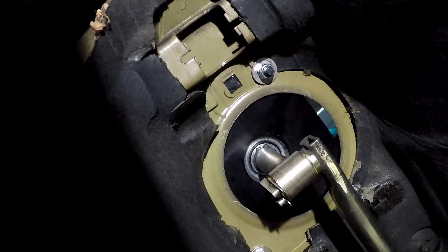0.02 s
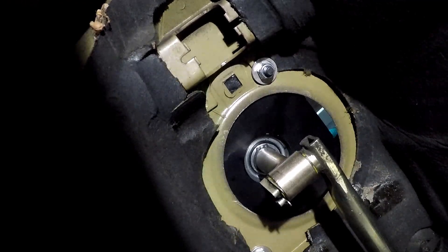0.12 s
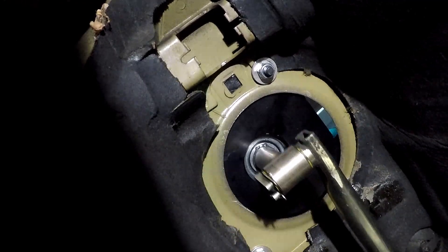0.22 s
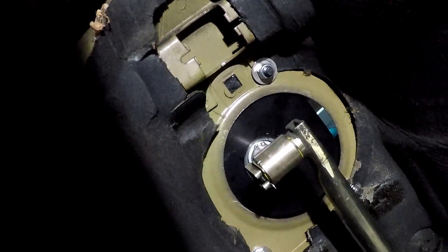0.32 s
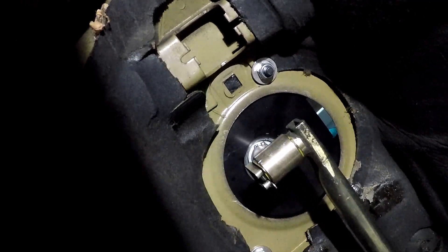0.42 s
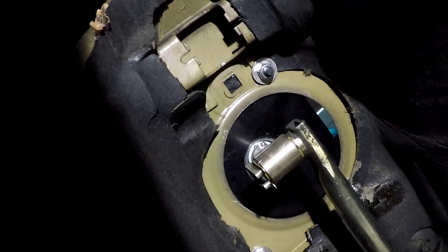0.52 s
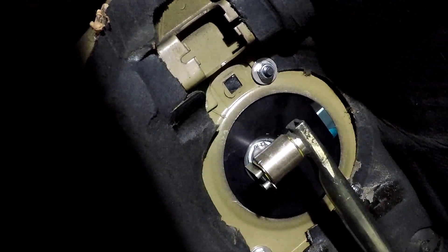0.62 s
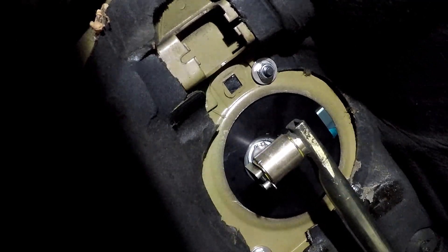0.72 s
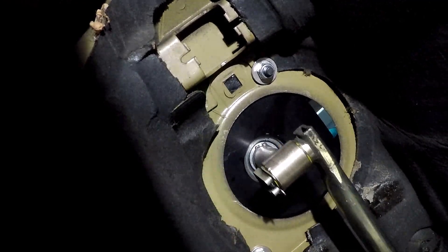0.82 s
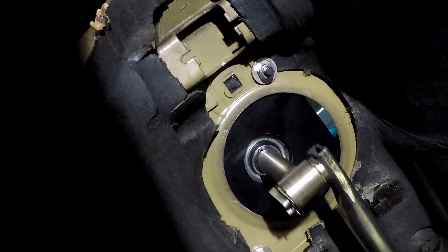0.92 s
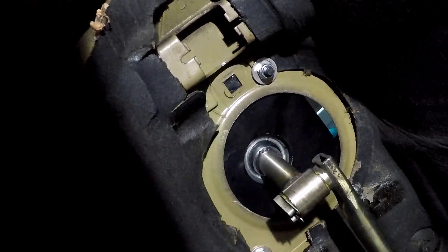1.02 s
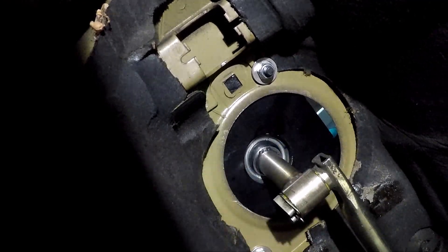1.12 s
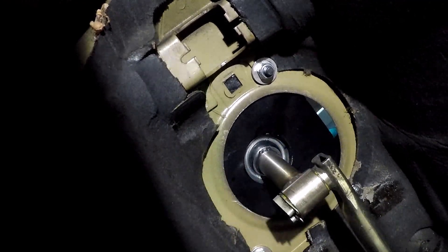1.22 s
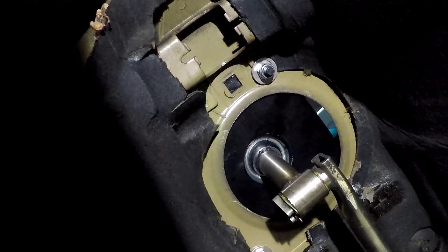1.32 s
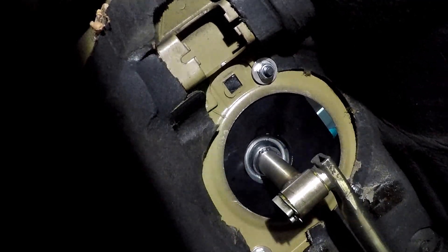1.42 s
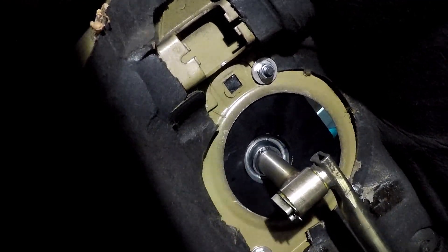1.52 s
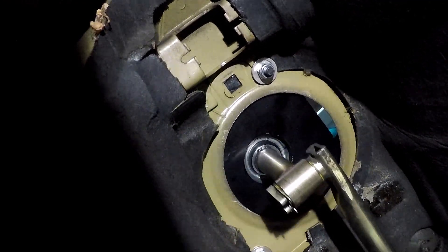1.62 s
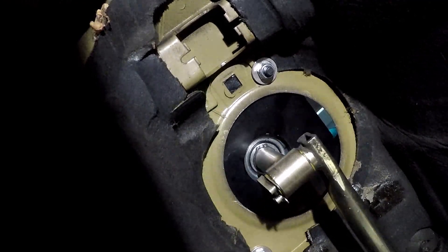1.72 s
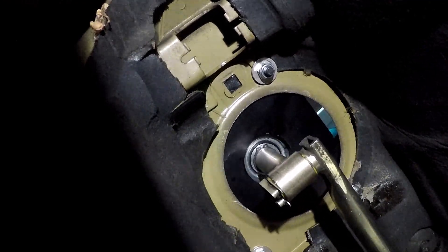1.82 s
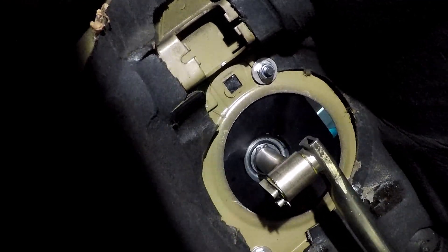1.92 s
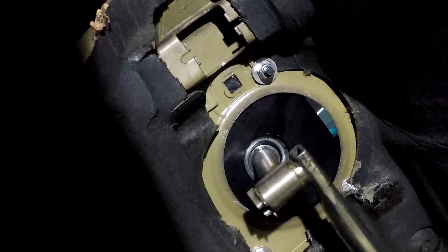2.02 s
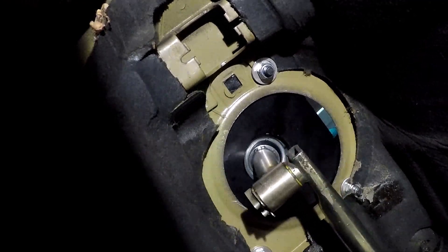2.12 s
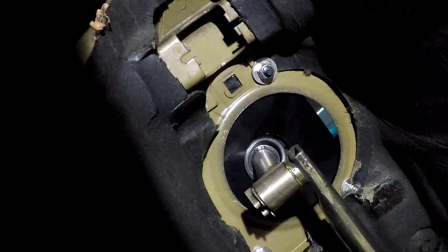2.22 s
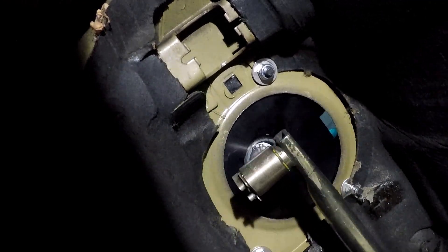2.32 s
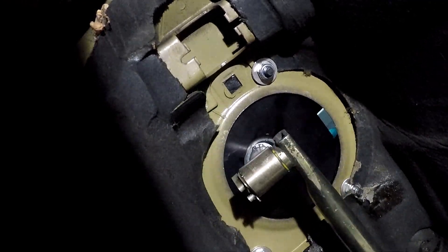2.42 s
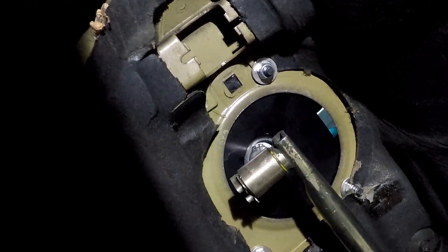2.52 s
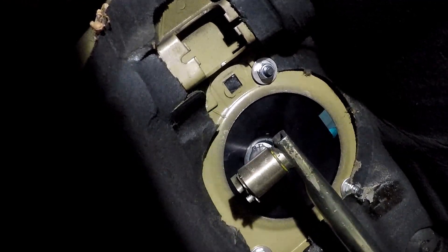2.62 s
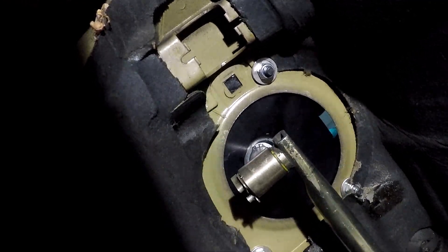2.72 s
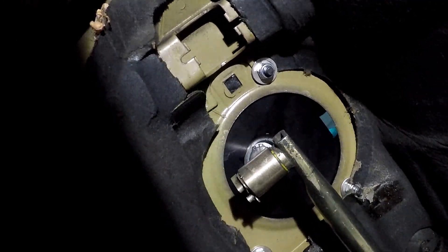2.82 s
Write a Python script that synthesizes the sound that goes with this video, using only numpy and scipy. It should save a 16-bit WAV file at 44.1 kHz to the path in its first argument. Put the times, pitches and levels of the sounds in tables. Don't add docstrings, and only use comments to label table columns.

```python
import sys
import numpy as np
from scipy import signal
from scipy.fft import rfft, irfft
from scipy.io import wavfile
from scipy.ndimage import uniform_filter1d, minimum_filter1d

SR = 44100
rng = np.random.default_rng(int(sys.argv[2]) if len(sys.argv) > 2 else 0)


def pcm_store(signal):
    levels = np.round(np.clip(np.atleast_2d(signal), -1, 1) * 32767)
    wavfile.write(sys.argv[1], SR, levels.astype(np.int16).T)


def invert_db(x):
    u = np.asarray(x, float) / 20
    return 10 ** u


N = 125685


def unit(x):
    return x / np.sqrt(np.mean(x ** 2) + 1e-30)


def resonance(x, hz, width):
    return signal.lfilter(*signal.iirpeak(hz, hz / width, fs=SR), x)


def double_resonance(x, hz, width):
    return resonance(resonance(x, hz, width), hz, width)


def wander(rate):
    hold = int(SR / rate)
    steps = np.repeat(rng.standard_normal(N // hold + 1), hold)
    return unit(uniform_filter1d(uniform_filter1d(steps, hold), hold)[:N])


def add(out, start_s, x):
    i = max(int(start_s * SR), 0)
    out[i:i + len(x)] += x[:N - i]


def soften(x, hz):
    return signal.sosfilt(signal.butter(4, min(hz, 15000), fs=SR, output="sos"), x)


# frequency in Hz, density in dB per Hz.
AIR_SPECTRUM = [(30, 5.5), (62, 4), (150, 9.5), (270, -15), (2200, -33.5), (3800, -44), (6000, -47),
                (13500, -57)]
# frequency in Hz, width in Hz, level in dB.
ROOM_RESONANCES = [(64, 5.9, -57), (119.8, 8.9, -54.5), (181, 21, -56.5), (390, 34, -72.5), (633, 100, -71),
                   (8100, 2400, -81)]


def room_hum():
    f = np.fft.rfftfreq(N, 1 / SR) + 1
    hz, db = np.array(AIR_SPECTRUM).T
    shape = invert_db(np.interp(np.log(f), np.log(hz), db))
    out = invert_db(-45) * unit(irfft(rfft(rng.standard_normal(N)) * shape, N))
    for hz, width, db in ROOM_RESONANCES:
        lump = resonance(resonance(rng.standard_normal(N), hz, 2 * width), hz, width)
        out += invert_db(db + 0.83 * wander(9.2)) * unit(lump)
    return out


# start in seconds, length in seconds, level in dB, centre in Hz, width in Hz.
RUBS = [(0, 0.24, -65, 1060, 1870), (0.783, .014, -70, 6400, 250), (0.344, 0.23, -78.5, 9700, 2500),
        (0.404, 0.29, -84, 8750, 300), (0.753, 0.021, -74, 6700, 200), (0.775, 0.13, -52, 550, 700),
        (0.976, 0.22, -76.5, 9300, 2560), (1.321, 0.32, -64, 1800, 1500), (1.47, 0.2, -57, 600, 900),
        (1.682, 0.2, -76, 9400, 2800), (1.7, 0.28, -60, 800, 1400), (1.937, 0.3, -52.5, 800, 1070),
        (2.133, .16, -68.5, 8200, 4500), (2.119, .16, -65.5, 4300, 1500), (2.133, .14, -57, 600, 1400),
        (2.405, 0.14, -79, 9500, 2470), (2.772, .045, -71, 1560, 40), (2.812, .036, -63, 1350, 50),
        (2.79, .05, -70, 1030, 50), (1.925, .07, -62, 970, 120), (.877, .012, -62, 6900, 300),
        (1.1, .15, -84, 10000, 900)]


def boot():
    out, t = np.zeros(N), np.arange(SR // 2) / SR
    for start, length, db, hz, width in RUBS:
        roughness_db = 1.5 * rng.exponential(size=SR // 2) + 1.5 * wander(60)[:SR // 2]
        grit = rng.standard_normal(SR // 2) * invert_db(roughness_db)
        stroke = np.sin(np.pi * np.clip(t / length, 0, 1) ** .75) ** .8
        add(out, start, invert_db(db) * unit(double_resonance(grit, hz, width)) * stroke)
    return out


# start in seconds, peak level in dB, pitch in Hz, 60 dB decay time in seconds.
KNOCKED_PARTS = [(.210, -34, 480, .05), (.214, -21, 195, .13), (.256, -22, 215, .12),
                 (.283, -31, 4900, .015), (.297, -31, 675, .14), (.375, -48, 640, .16),
                 (.772, -29, 200, .08), (.774, -48, 620, .06), (.796, -45, 5900, .025),
                 (.803, -30, 205, .08), (.855, -44, 355, .08), (.900, -22, 205, .08), (.905, -30, 590, .12),
                 (.910, -27, 350, .14), (.963, -28, 580, .07), (.980, -28, 680, .13),
                 (1.459, -26, 180, .09), (1.460, -36, 850, .07), (1.49, -45, 350, .2),
                 (1.502, -55, 5800, .025), (1.630, -53, 4800, .03), (1.668, -29, 650, .06),
                 (1.672, -22, 205, .11), (1.69, -36, 350, .17), (1.765, -43, 580, .07),
                 (1.85, -49, 355, .17), (1.972, -45, 680, .12), (2.015, -39, 400, .06),
                 (2.050, -38, 1150, .04), (2.052, -33, 620, .06), (2.104, -27, 810, .07),
                 (2.11, -38, 2200, .06), (2.15, -45, 780, .1), (2.278, -43, 2300, .03),
                 (2.328, -31, 4950, .012), (2.335, -31, 675, .14), (2.42, -46, 350, .2),
                 (2.44, -51, 580, .12), (2.53, -55, 380, .2), (2.665, -59, 385, .25), (.252, -23, 128, .22),
                 (.962, -22, 68, .22), (1.675, -29, 72, .2), (2.308, -22, 72, .17), (2.102, -23, 200, .1),
                 (.378, -28, 125, .2), (2.2, -44, 300, .15)]


def brackets():
    split, second_db, choke, rise_cycles = .05, -5, 1.7, .6
    out, t = np.zeros(N), np.arange(SR // 2) / SR
    for start, db, hz, t60 in KNOCKED_PARTS:
        first = np.sin(2 * np.pi * hz * t)
        second = invert_db(second_db) * np.sin(2 * np.pi * hz * (1 - split) * t)
        decay = invert_db(db - 60 * (t / max(t60, .005)) ** choke)
        add(out, start, (first + second) * decay * (1 - np.exp(-t * hz / rise_cycles)))
    return out


# band centre in Hz, level in dB, 60 dB decay time in seconds.
GARAGE_TAIL = [(520, -31, 0.26), (1450, -29.5, 0.33), (2420, -35, 0.35), (4200, -27.5, 0.4),
               (6830, -27, 0.3), (9600, -18.5, 0.19)]


def garage(x):
    t = np.arange(SR // 2) / SR
    tail = np.zeros(len(t))
    for hz, db, t60 in GARAGE_TAIL:
        haze = unit(double_resonance(rng.standard_normal(len(t)), hz, hz * 0.74))
        tail += invert_db(db - 60 * t / t60) * haze / np.sqrt(t60 * SR / 28)
    build_up = 1 - np.exp(-t / 0.0024)
    return signal.fftconvolve(x, tail * build_up)[:N]


def ring(modes, chance, push):
    scatter_db, detune = .5, .015
    hz, db, t60 = np.tile(np.array(modes), (3, 1)).T[:, :, None]
    level_luck, pitch_luck, phase_luck = chance[:, :len(hz), None]
    hz = hz * (1 + detune * pitch_luck)
    t = np.arange(int(1.5 * t60.max() * SR)) / SR
    share = np.abs(rfft(push, 2 ** 14))[np.round(hz * 2 ** 14 / SR).astype(int)]
    gain = invert_db(db + scatter_db * level_luck - 60 * t / t60) / (share + 0.59 * share.mean())
    modes_sum = (gain * np.sin(2 * np.pi * hz * t + 3 * phase_luck)).sum(axis=0)
    return signal.fftconvolve(push, modes_sum)


# start in seconds, rod clank in dB, casing thud in dB, pin tick in dB,
# chatter in seconds.
GATE_STOPS = [(0.219, -30.5, -22, -52, 0.0024), (0.232, -23.5, -15, -45, 0.005),
              (.252, -18.5, -16, -37, 0.007), (0.269, -36, -17.5, -44, 0.0083),
              (.280, -19.5, -20, -33, 0.0058), (0.289, -56, -20.5, -35, 0.0067),
              (0.887, -22.5, -21.5, -32, 0.0094), (.900, -33, -19, -41, 0.024),
              (.948, -29, -15, -45, 0.0027), (0.963, -27, -39, -49, 0.024),
              (.978, -30.5, -20, -36.5, 0.0048), (1.457, -38.5, -19.5, -61.5, 0.0092),
              (1.666, -23.5, -20.5, -31.5, 0.0057), (1.677, -29, -19, -38, 0.0073),
              (2.104, -21.5, -16, -51.5, 0.0062), (2.277, -38, -30, -45, .005),
              (2.310, -19.5, -20, -32.5, 0.0049), (2.326, -20.5, -21, -34, 0.0062)]
# start in seconds, rod clank in dB, casing thud in dB, pin
# tick in dB, chatter in seconds.
LIGHT_KNOCKS = [(0.794, -40, -29, -42.5, 0.0056), (1.5, -47, -50, -52.5, 0.0038),
                (1.598, -64, -45, -72, 0.0052), (1.630, -48, -32, -53, .008), (1.767, -47, -40, -59, .005),
                (1.843, -57, -43, -62, 0.004), (1.968, -64, -37.5, -72, 0.015),
                (1.995, -56, -34, -63, 0.0082), (2.048, -39.5, -22.5, -51.5, 0.0029),
                (2.076, -38.5, -24, -52, 0.0041), (2.155, -62, -36.5, -65, 0.0027),
                (2.291, -39, -25, -52.5, 0.008), (0.877, -50, -45, -58, 0.005)]
# frequency in Hz, level in dB, 60 dB decay time in seconds.
CASING_MODES = [(200, -3, 0.13), (231.7, -5, 0.15), (293, -12, 0.15), (349, -2, 0.11), (389.5, -5.5, 0.052),
                (446.3, -4, 0.058), (540, -5, 0.039), (605.2, -3, 0.063), (700, -5, 0.05),
                (800, -6.5, 0.039)]
# frequency in Hz, level in dB, 60 dB decay time in seconds.
ROD_MODES = [(897, -4, 0.061), (980, 11.5, 0.016), (1170, 13.5, 0.024), (1355, 5, 0.055), (1500, 11, 0.014),
             (1650, 9, 0.016), (1813, 6.5, 0.031), (2028, -10.5, 0.09), (2310, 3, 0.028),
             (2640, -11.5, 0.09), (2800, -18.5, 0.072), (3365, -14.5, 0.0083)]
# frequency in Hz, level in dB, 60 dB decay time in seconds.
PIN_MODES = [(3400, -9, .012), (3840, -6, .016), (4400, -4, .02), (4750, -2, .02), (5000, 0, .022),
             (5350, -4, .015), (5750, -7, .012), (6150, -6, .012), (6550, -8, .016), (7100, -11, .012),
             (7700, -13, .012), (8600, -16, .01), (9800, -20, .008), (11500, -27, .006)]


def linkage():
    touches_per_s, touch_spread_db, rise_s = 5994, 2, 0.002
    lead_db, lead_s = -21, 0.0088
    crack_db, crack_s = -12, 0.0024
    out, t = np.zeros(N), np.arange(-1024, 1024) / SR
    after = np.maximum(t, 0)
    swell = 1 - np.exp(-after / rise_s) + invert_db(lead_db) * np.exp(-np.abs(t) / lead_s)
    for start, clank_db, thud_db, tick_db, length in GATE_STOPS + LIGHT_KNOCKS:
        dice, noise, size = rng.random(2048), rng.standard_normal(2048), rng.exponential(size=2048)
        chance = rng.standard_normal((3, 3, 48))
        touch = np.clip((touches_per_s / SR - dice) * SR / 300, 0, 1)
        touch = touch * np.sign(noise) * invert_db(touch_spread_db * size)
        push = touch * swell * np.exp(-(after / max(length, .002)) ** 0.92)
        head = slice(1024, 1024 + int((.012 + length) * SR))
        parts = [(CASING_MODES, thud_db - 8, 1300),
                 (ROD_MODES, clank_db - 8, 4000),
                 (PIN_MODES, tick_db - 8.5, 12000)]
        for (modes, db, top_hz), luck in zip(parts, chance):
            y = soften(ring(modes, luck, push), top_hz)
            add(out, start + t[0], y * invert_db(db) / np.sqrt(np.mean(y[head] ** 2)))
        crack = soften(resonance(noise, 5500, 11000), 13000)
        crack = crack * swell * np.exp(-after / (crack_s + length / 2))
        add(out, start + t[0], invert_db(tick_db + crack_db) * crack)
    return out


# start in seconds, level in dB, shake in seconds.
PAN_JOLTS = [(0.227, -27, 0.09), (0.279, -32, 0.06), (.375, -31, 0.07), (0.461, -48, 0.23),
             (0.77, -35, 0.13), (0.889, -25, 0.037), (0.959, -30, 0.044), (1.06, -36, 0.083),
             (1.456, -31.5, 0.055), (1.602, -38, 0.017), (1.67, -30, 0.07), (1.771, -36.5, 0.17),
             (1.898, -39, 0.032), (1.99, -33, 0.12), (2.072, -31, 0.08), (2.158, -43, 0.027),
             (2.281, -27, 0.013), (2.315, -30, 0.023), (2.38, -29, 0.074), (2.425, -31, 0.05),
             (2.492, -33, 0.04), (2.535, -32, 0.05)]
# frequency in Hz, level in dB, 60 dB decay time in seconds.
PAN_MODES = [(50, -4, 0.23), (67.33, 5, 0.26), (97.35, -3, 0.52), (125.25, 3, 0.33), (147.7, -0.5, 0.45),
             (185, -8, 0.14)]


def floor_pan():
    out, t = np.zeros(N), np.arange(SR // 4) / SR
    for start, db, length in PAN_JOLTS:
        shake = rng.standard_normal(SR // 4) * np.exp(-t / max(length, .01))
        y = soften(ring(PAN_MODES, .5 * rng.standard_normal((3, 24)), shake), 223)
        head = y[:int((.03 + length) * SR)]
        add(out, start, y * invert_db(db) / np.sqrt(np.mean(head ** 2)))
    return out


def scene():
    air, rubs, knocks, steel = room_hum(), boot(), brackets(), linkage()
    haze, pan = garage(steel + knocks), floor_pan()
    wobble = invert_db(1.8 * wander(70))
    mono = steel + haze + pan + rubs + air + knocks * wobble
    top = signal.sosfilt(signal.butter(10, 12300, "high", fs=SR, output="sos"), mono)
    hiss = invert_db(-97) * unit(double_resonance(rng.standard_normal(N), 12200, 1800))
    side = hiss + 0.55 * np.roll(top, shift=1)
    return mono + side * np.array([[1.2], [-1]])


def roll_off(x):
    return signal.sosfilt(signal.butter(12, 15540, fs=SR, output="sos"), x)


def record(dry):
    x = signal.sosfilt(signal.butter(4, 44, "high", fs=SR, output="sos"), dry)
    x = signal.sosfilt(signal.ellip(8, .2, 60, 15300, fs=SR, output="sos"), x)
    ceiling = .235
    gain = np.minimum(1, ceiling / (np.abs(x).max(axis=0) + 1e-9))
    gain = uniform_filter1d(minimum_filter1d(gain, size=257), size=257)
    return roll_off(x * gain)


dry = scene()
out = record(dry)
pcm_store(out)
```